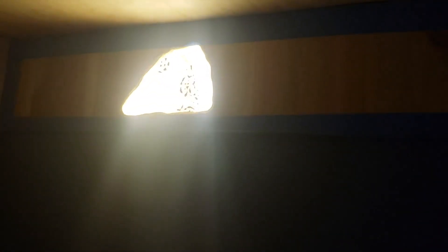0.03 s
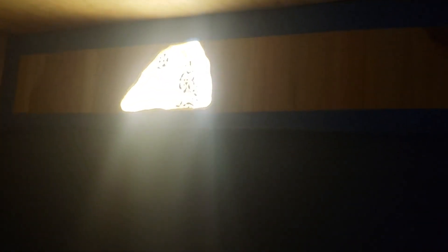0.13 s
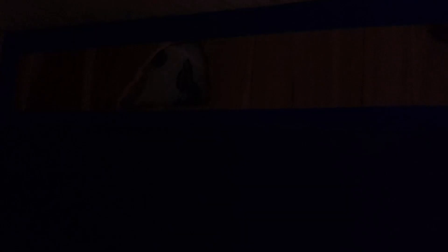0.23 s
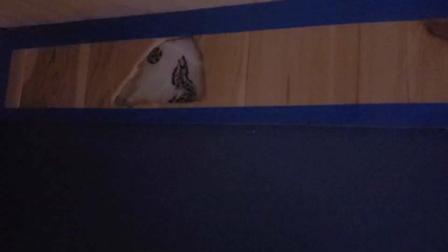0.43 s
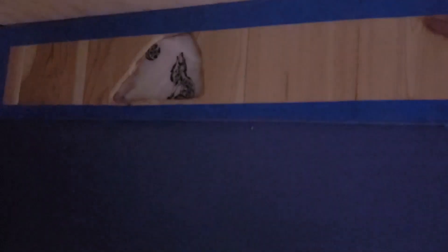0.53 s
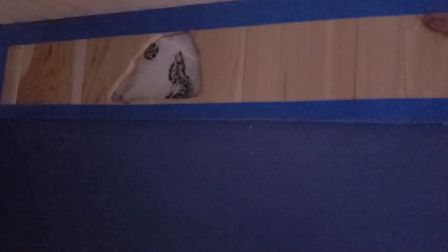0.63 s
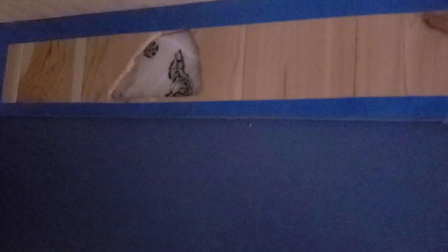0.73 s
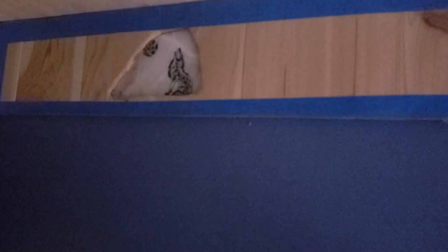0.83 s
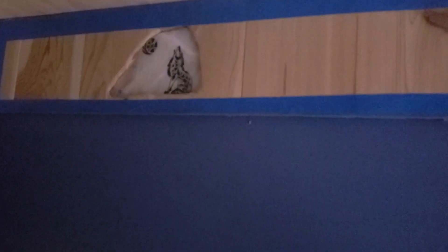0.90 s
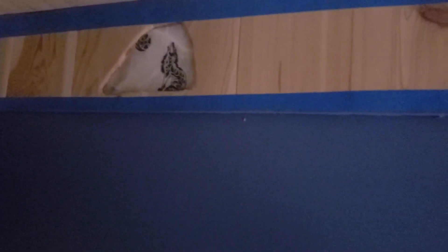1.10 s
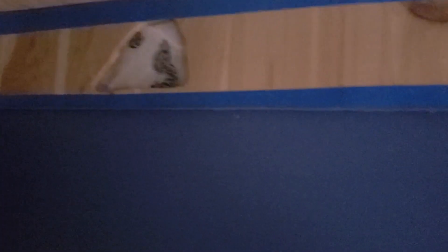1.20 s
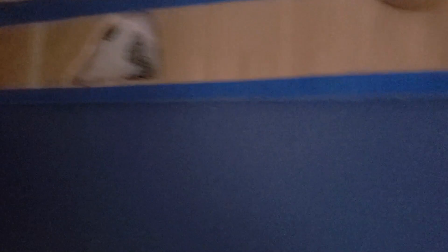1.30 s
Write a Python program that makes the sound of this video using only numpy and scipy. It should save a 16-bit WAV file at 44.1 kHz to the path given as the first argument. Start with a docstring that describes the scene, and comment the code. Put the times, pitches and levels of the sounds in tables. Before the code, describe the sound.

A light switch clicks once in a small wood-lined space. Quiet, wavering low hum, rumble and very faint hiss run throughout. At about 0.23 seconds a faint touch leads straight into a sharp, bright plastic snap, a tight cluster of clicks lasting some 0.01 seconds, with a faint panel thump and short dense reverberation fading by about 0.5. Soft handling bumps follow near 0.52, 1.14 and 1.25, mostly right.

```python
"""A low narrow-band rumble near 55 Hz that fades at random (drawn as a tone on one set course of frequency and
level), broader rumble and hiss (shaped noise) sound throughout. At about 0.23 s a plastic rocker switch in a
small wood-lined space makes a faint first touch, then snaps over; filtered noise bursts give the snap and its
returns from near walls, decaying noise the short dense tail, and damped sines the panel boom. From 0.5 s a few
soft bumps, low tone pulses, strike the hand-held two-port microphone, mostly at the right port."""
import sys
import numpy as np
from scipy import signal
from scipy.fft import rfft, irfft
from scipy.io import wavfile
from scipy.ndimage import uniform_filter1d

SR = 44100
rng = np.random.default_rng(int(sys.argv[2]) if len(sys.argv) > 2 else 0)


def digitize_waveform(pressure):
    """Quantize a signal to 16-bit integers and store it at the path in sys.argv[1].

    Rows of a 2-D input are taken as channels; values are limited to [-1, 1].
    """
    field = np.atleast_2d(pressure).T
    bounded = np.clip(field, -1, 1)
    quanta = np.round(bounded * 32767).astype(np.int16)
    wavfile.write(sys.argv[1], SR, quanta)


N = 59535  # length of the scene in samples

# First touch, snap and early returns: (time [s], left peak [dB], right peak [dB],
# Gaussian half-width [s], treble emphasis before peak scaling [dB])
ARRIVALS = [(0.2342, -35, -33, .0008, -0.5), (.2367, -16, -9.5, 0.00051, -9), (.2372, -17, -5, .0003, -7),
            (.2381, -19.5, -18.5, 0.00044, -7.5), (.2394, -14.5, -10.5, .0005, -8),
            (0.2403, -24.5, -14.5, 0.00042, -7), (0.2421, -15, -14, .0007, 5),
            (0.2438, -11, -15, .0004, -1.5), (0.2454, -12.5, -19, 0.00018, 0), (.2457, -20, -15, .0005, -1),
            (.2471, -16, -18, 0.00033, 2.5)]
# Colour of the snap: (frequency [Hz], relative spectral level [dB])
SNAP_SPECTRUM = [(410, -28), (700, -19.5), (810, -39), (1450, -23), (1700, -30.5), (1870, -15.5),
                 (2130, -15), (2670, -22.5), (3180, -1), (3820, -11), (4200, 3.5), (5190, -2), (6090, -7.5),
                 (6500, -15.5), (7730, -21.5), (8260, -34), (10100, -9), (13900, -26), (15000, -18.5),
                 (16000, -26), (16700, -48.5)]
# Colour difference between the ports: (frequency [Hz], left minus right [dB])
SNAP_SIDE = [(700, 0.5), (1200, 2.5), (2000, -2.5), (3200, -6.5), (4300, -4.5), (5000, -3), (5600, 13),
             (6500, 3.5), (8000, 1), (10000, 11.5), (12000, 0), (15000, 0.5)]
TREBLE_HZ = 8600  # where the treble emphasis begins

# Main decay of the room: (frequency [Hz], T60 [s])
ROOM_DECAY = [(400, 0.23), (1000, .25), (2000, .22), (3000, 0.15), (5000, .17), (8000, 0.19), (11000, 0.16),
              (15000, 0.25)]
# Weaker, slower second decay: (frequency [Hz], T60 [s])
LINGER_DECAY = [(700, .28), (2000, .27), (3300, .32), (4300, .31), (5500, .34), (8000, .28), (11000, .28),
                (15000, .25)]
LINGER_DB = -12  # second decay relative to the first at onset
TAIL_START_S, TAIL_RISE_S, TAIL_DB = 0.2375, 0.021, -18.5

# Panel modes: (frequency [Hz], peak level before port balance [dB], time to peak [s], T60 [s])
PANEL_MODES = [(88.16, -43.5, .015, 0.18), (148, -51.5, .07, 0.093), (181.5, -42, .035, 0.35),
               (322.3, -49, 0.0266, 0.034), (418, -51.5, 0.023, 0.087), (550, -52, 0.022, 0.076),
               (711.2, -50, 0.0059, 0.06986)]
PANEL_START_S, PANEL_SIDE_DB = 0.236, -4  # side level is left minus right
PANEL_PHASE_RAD = 1  # phase between the ports

# Soft bumps: (time [s], push level at right port [dB], ring level at right port [dB])
BUMPS = [(0.518, -46, -58.5), (1.139, -39.5, -48), (1.241, -44, -57), (1.269, -46, -42.5)]
BUMP_LEFT_DB = -16  # left port relative to right
PUSH_HZ, PUSH_S, RING_HZ, RING_S = 113.1, 0.005, 270.4, 0.0048  # tones and Gaussian half-widths
KNOCK_HZ, KNOCK_DB = 517, -22  # weaker upper ring, relative to the main ring

# Low narrow-band rumble, drawn as one tone: (time [s], frequency [Hz], RMS level of the shared tone [dB])
LOW_BAND_TRACK = [(0, 61.1, -46.5), (0.05, 51.9, -53), (0.11, 53.54, -53), (0.165, 51.64, -56.5),
                  (0.202, 58.36, -52), (0.246, 62.9, -60), (0.284, 58.97, -41.5), (0.331, 54.2, -46.5),
                  (0.375, 46.88, -65), (0.411, 48.67, -54), (0.457, 57.7, -48), (0.5, 56.83, -54),
                  (0.535, 60.12, -57), (0.571, 60.63, -51), (0.61, 67.33, -60), (0.64, 65.24, -73),
                  (0.678, 54.1, -47.5), (0.704, 55, -60), (0.733, 58.3, -38), (0.776, 61.13, -58),
                  (0.805, 54.18, -49.5), (0.855, 53.16, -42.7), (0.885, 54.4, -56), (0.915, 54.4, -45),
                  (0.965, 60.47, -53), (1.016, 54.2, -45), (1.05, 53.43, -57), (1.09, 62, -57.5),
                  (1.14, 56.56, -51), (1.18, 50.8, -49.5), (1.22, 52.42, -63.5), (1.26, 64.4, -50),
                  (1.29, 61.4, -40.5), (1.35, 56.7, -67.5)]
LOW_BAND_APART_DB = -14.5  # opposed part at the two ports, relative to the shared tone
BUZZ_HZ, BUZZ_WIDTH_HZ, BUZZ_DB = 124.4, 4.4, -68.5

# Colour of rumble and hiss: (frequency [Hz], relative spectral level [dB])
AIR_SPECTRUM = [(15, -16), (28, -10.5), (45, -10.5), (70, -11), (90, -15.5), (140, -20.5), (200, -27),
                (300, -37), (400, -45), (600, -49.5), (1500, -55.5), (3500, -60.5), (6200, -62.5),
                (7000, -69), (8600, -72), (9500, -63.5), (12000, -59), (15300, -59.5), (15900, -63.5),
                (16700, -80.5)]
# Likeness of the ports, negative values read as zero: (frequency [Hz], correlation [ratio])
AIR_LIKENESS = [(30, 0.99), (60, 0.4), (120, 0.52), (180, 0.047), (330, .45), (500, .1), (1600, -.1),
                (15000, .01)]
# Difference of the ports: (frequency [Hz], left minus right [dB])
AIR_SIDE = [(60, 0.5), (180, -3), (550, -1), (1650, -1.5), (4970, 2), (15000, 2.5)]
# Swell of the rumble: (time [s], relative level [dB])
RUMBLE_SWELL = [(0, -12), (.2, -0.5), (.3, 0.5), (.55, -2.5), (.63, -6), (.7, -2), (1.0, -3), (1.35, 0)]
AIR_DB, RUMBLE_TOP_HZ = -52.5, 900

EDGE_HZ = 16600  # upper band limit


def gain_of(db):
    """The decibel law: amplitude ratio from level."""
    return 10 ** (np.asarray(db) / 20)


def evened(x):
    """Normalization to unit RMS."""
    return x / np.sqrt(np.mean(x ** 2) + 1e-20)


def read(points, hz):
    """Linear interpolation over logarithmic frequency."""
    f, value = np.transpose(points)
    return np.interp(np.log(hz + 1), np.log(f + 1), value)


def add(mix, start_s, sound):
    """Superposition of a sound on the mix from a given time."""
    part = mix[..., round(start_s * SR):][..., :sound.shape[-1]]
    part += sound[..., :part.shape[-1]]


def ports(side_db):
    """Level difference split equally between the left and right gains."""
    return gain_of(np.array([side_db / 2, -side_db / 2]))


def causal(db):
    """Minimum phase: folding the cepstrum gives a causal response with a chosen level spectrum."""
    cepstrum = irfft(np.log(gain_of(np.maximum(db, -100))))
    half = len(cepstrum) // 2
    folded = np.r_[cepstrum[0], 2 * cepstrum[1:half], cepstrum[half], np.zeros(half - 1)]
    return irfft(np.exp(rfft(folded)))[:half]


def snap():
    """Source-filter principle: brief contact chatter excites switch and port, then returns early."""
    hz = np.fft.rfftfreq(2048, 1 / SR)
    t = np.arange(-80, 80) / SR
    treble_weight = 1 / (1 + (TREBLE_HZ / (hz + 1)) ** 8)
    out = np.zeros((2, N))
    for ear, side_share in enumerate((0.5, -0.5)):
        colour_db = read(SNAP_SPECTRUM, hz) + side_share * read(SNAP_SIDE, hz)
        chatters = rng.standard_normal((len(ARRIVALS), len(t)))
        for (time_s, left_db, right_db, width_s, treble_db), chatter in zip(ARRIVALS, chatters):
            smooth_db = uniform_filter1d(colour_db + treble_db * treble_weight, size=19)
            burst = chatter * np.exp(-(t / width_s) ** 2)
            click = np.convolve(burst, causal(smooth_db))
            peak_gain = gain_of((left_db, right_db)[ear])
            add(out[ear], time_s + t[0], peak_gain * click / abs(click).max())
    return out


def tail():
    """Diffuse reverberation: dense reflections decay band by band, independently at the two ports."""
    noise = rng.standard_normal((2, SR // 2))
    hz, t, bands = signal.stft(noise, SR, nperseg=512, noverlap=448)
    colour = evened(gain_of(read(SNAP_SPECTRUM, hz)) * ports(read(SNAP_SIDE, hz)))
    main_db = -60 * t / read(ROOM_DECAY, hz)[:, None]
    linger_db = LINGER_DB - 60 * t / read(LINGER_DECAY, hz)[:, None]
    decay = np.hypot(gain_of(main_db), gain_of(linger_db))  # sum of the two powers
    diffuse = signal.istft(bands * colour[..., None] * decay, SR, nperseg=512, noverlap=448)[1]
    rise = np.sqrt(np.minimum(np.arange(diffuse.shape[1]) / SR / TAIL_RISE_S, 1))
    out = np.zeros((2, N))
    add(out, TAIL_START_S, gain_of(TAIL_DB) * diffuse * rise)
    return out


def panel():
    """Modal vibration: low modes of the wall panel swell and decay exponentially after the snap."""
    t = np.arange(SR // 2) / SR
    lead = np.array([[0.5], [-0.5]]) * PANEL_PHASE_RAD
    boom = np.zeros((2, len(t)))
    for k, (hz, peak_db, peak_s, t60_s) in enumerate(PANEL_MODES):
        swell = np.sin(np.pi / 2 * np.minimum(t / peak_s, 1)) ** 2
        decay = gain_of(peak_db - 60 * np.maximum(t - peak_s, 0) / t60_s)
        # Successive modes lead at opposite ports.
        boom += decay * swell * np.sin(2 * np.pi * hz * t + (-1) ** k * lead)
    out = np.zeros((2, N))
    add(out, PANEL_START_S, boom * ports(PANEL_SIDE_DB)[:, None])
    return out


def bumps():
    """Impulsive excitation: short low pushes against the microphone body, which rings briefly."""
    out = np.zeros(N)
    t = np.arange(-800, 800) / SR
    push = -np.exp(-(t / PUSH_S) ** 2) * np.cos(2 * np.pi * PUSH_HZ * t + 1)
    knock = gain_of(KNOCK_DB) * np.sin(2 * np.pi * KNOCK_HZ * t)
    ring = np.exp(-(t / RING_S) ** 2) * (np.sin(2 * np.pi * RING_HZ * t) + knock)
    for time_s, push_db, ring_db in BUMPS:
        bump = gain_of(push_db) * push + gain_of(ring_db) * ring
        add(out, time_s + PUSH_S + t[0], bump)  # centred PUSH_S after its time
    return out * gain_of([[BUMP_LEFT_DB], [0]])


def narrow_rumble():
    """Narrow-band rumble drawn as frequency and amplitude modulation of a low tone, with narrow-band noise
    about an octave above."""
    time_s, pitch_hz, level_db = np.transpose(LOW_BAND_TRACK)
    t = np.arange(N) / SR
    slow_noise = uniform_filter1d(uniform_filter1d(rng.standard_normal(N), 2000), 2000)
    drift = evened(slow_noise)
    cycles = np.cumsum(np.interp(t, time_s, pitch_hz)) / SR
    phase = 2 * np.pi * (cycles + rng.random())
    apart = gain_of(LOW_BAND_APART_DB) * np.outer([1, -1], drift * np.cos(phase))
    tone = np.sqrt(2) * gain_of(np.interp(t, time_s, level_db)) * (np.sin(phase) + apart)
    hz = np.fft.rfftfreq(N, 1 / SR)
    resonance = 1 / (1 + ((hz - BUZZ_HZ) / BUZZ_WIDTH_HZ) ** 4)
    buzz = irfft(rfft(rng.standard_normal(N)) * resonance, N)
    return tone + gain_of(BUZZ_DB) * evened(buzz)


def air():
    """Partial coherence: swelling rumble largely shared at its lowest, steady hiss nearly independent."""
    hz = np.fft.rfftfreq(N, 1 / SR)
    first, second = rfft(rng.standard_normal((2, N)))
    likeness = np.clip(read(AIR_LIKENESS, hz), 0, 1)
    right = likeness * first + np.sqrt(1 - likeness ** 2) * second
    colour = evened(gain_of(read(AIR_SPECTRUM, hz)))
    spectrum = np.array([first, right]) * ports(read(AIR_SIDE, hz)) * colour
    low_share = 1 / (1 + (hz / RUMBLE_TOP_HZ) ** 2)
    rumble = irfft(spectrum * low_share, N)
    hiss = irfft(spectrum * (1 - low_share), N)
    swell = gain_of(np.interp(np.arange(N) / SR, *np.transpose(RUMBLE_SWELL)))
    return gain_of(AIR_DB) * (swell * rumble + hiss)


def scene():
    """Superposition of all sources at the two ports."""
    return snap() + tail() + panel() + bumps() + narrow_rumble() + air()


def record(dry):
    """Band limitation by a symmetric, linear-phase low-pass filter."""
    low_pass = signal.firwin(511, EDGE_HZ, window=("kaiser", 9), fs=SR)
    return signal.oaconvolve(dry, low_pass[None], "same")


dry = scene()
out = record(dry)
digitize_waveform(out)
```